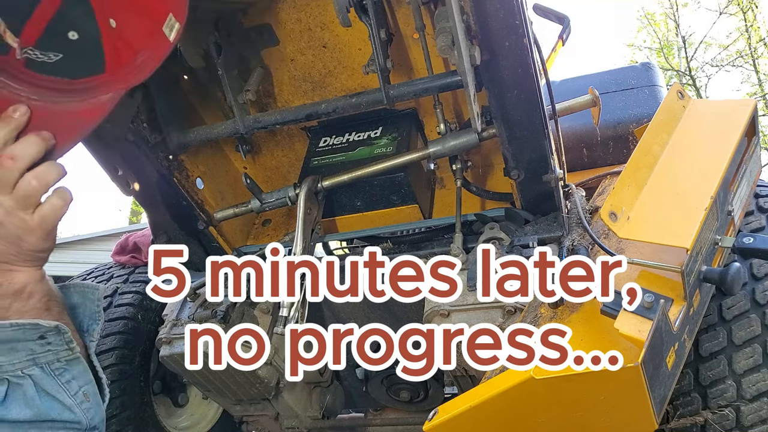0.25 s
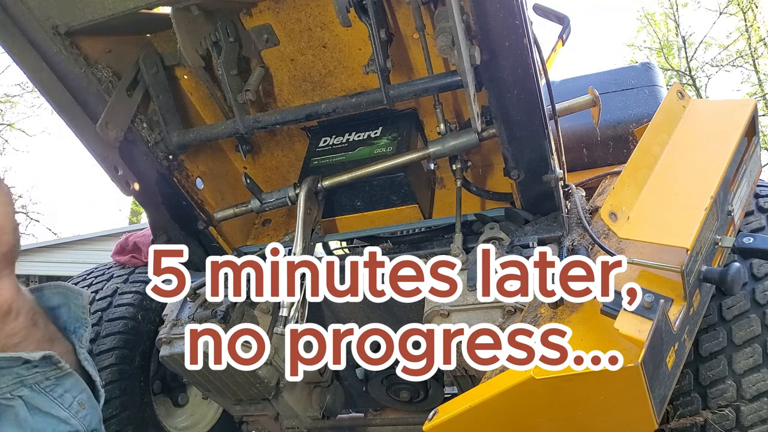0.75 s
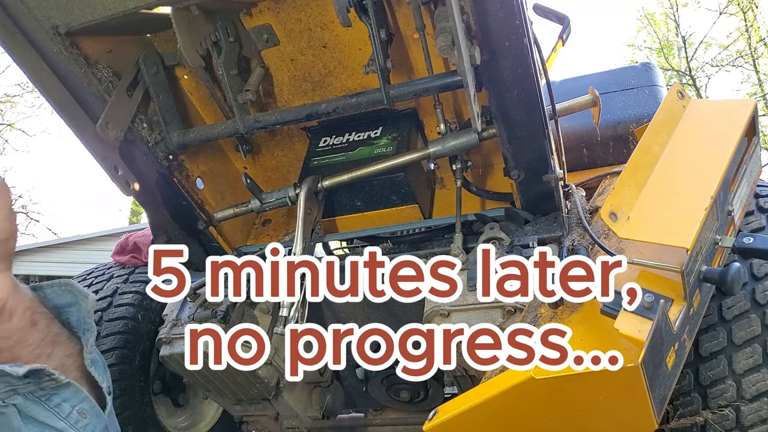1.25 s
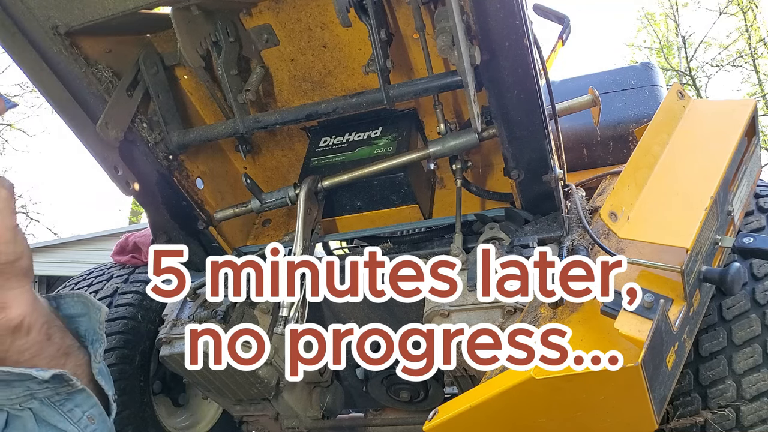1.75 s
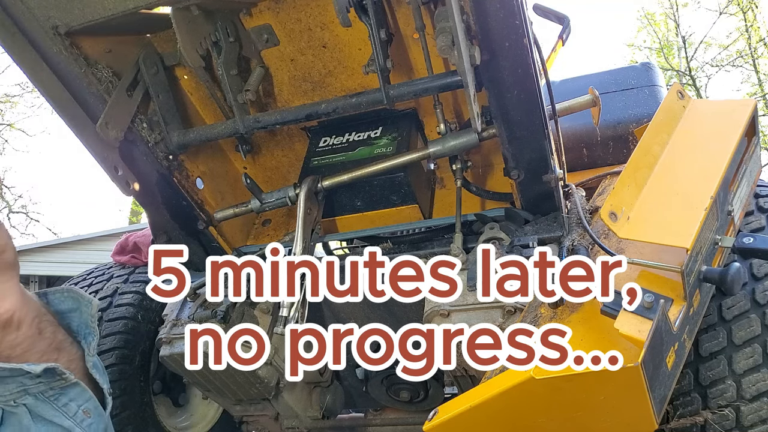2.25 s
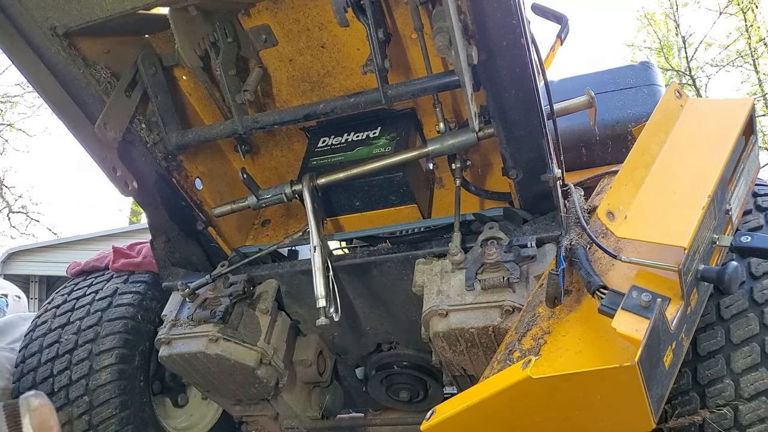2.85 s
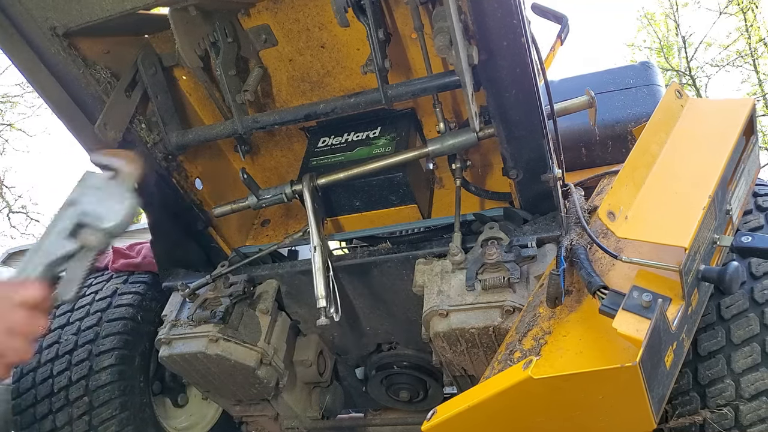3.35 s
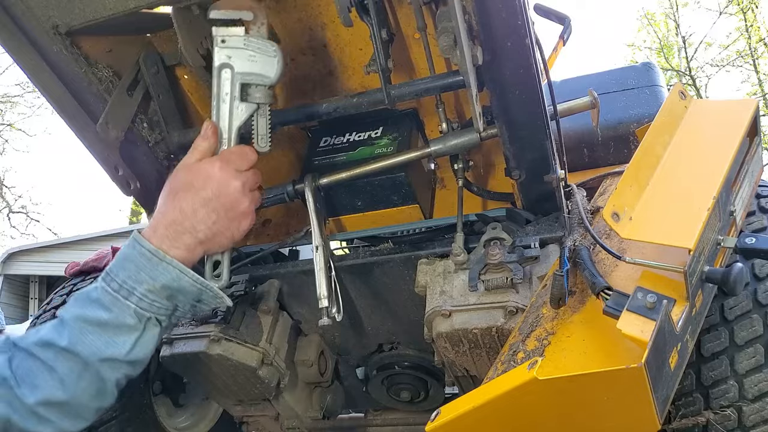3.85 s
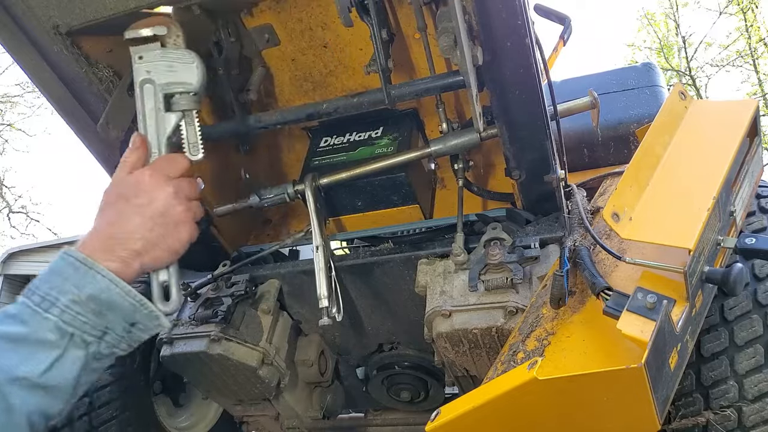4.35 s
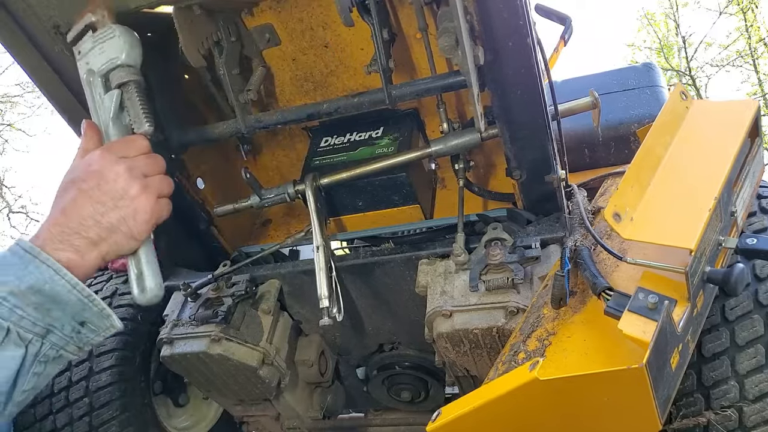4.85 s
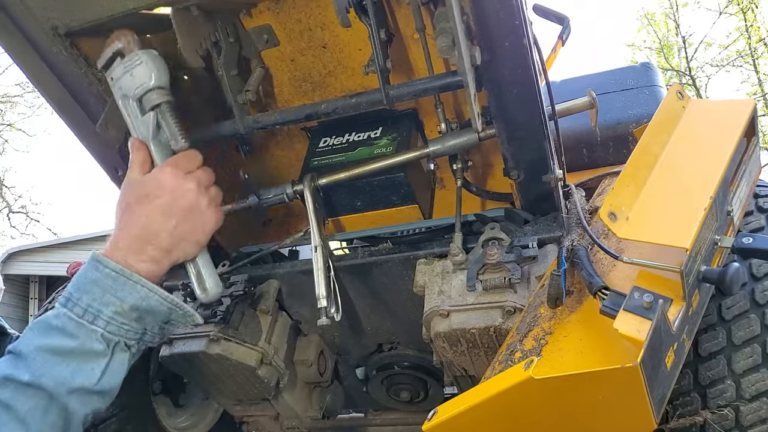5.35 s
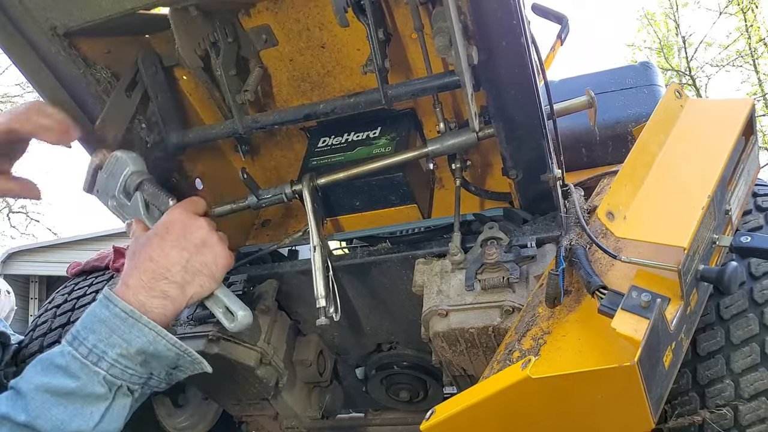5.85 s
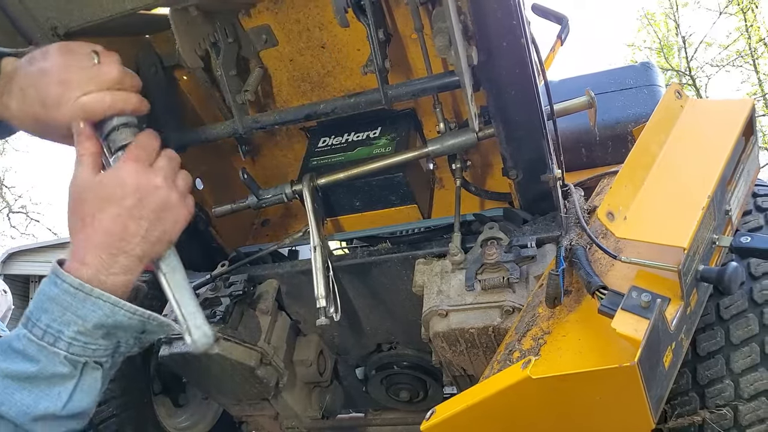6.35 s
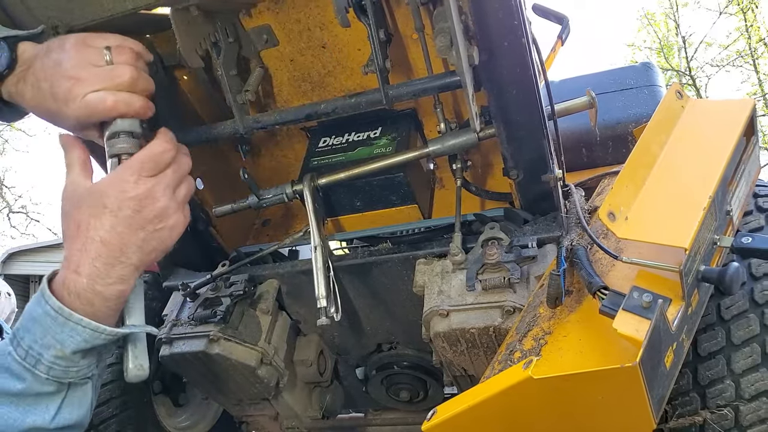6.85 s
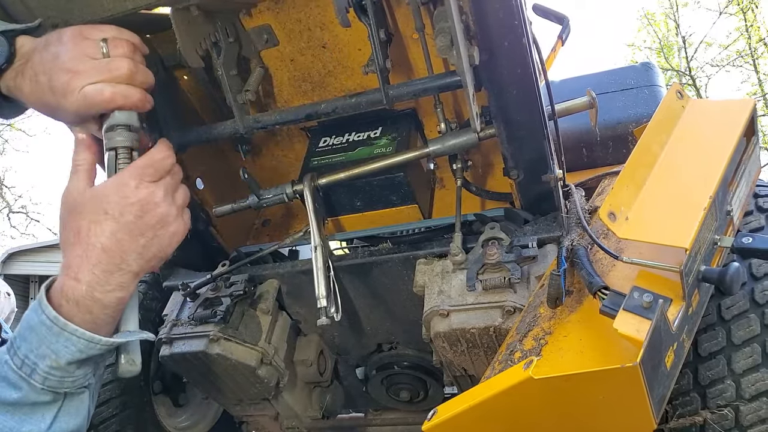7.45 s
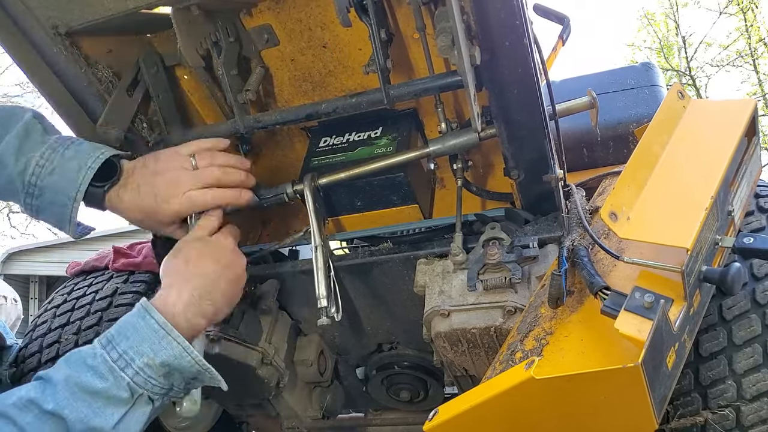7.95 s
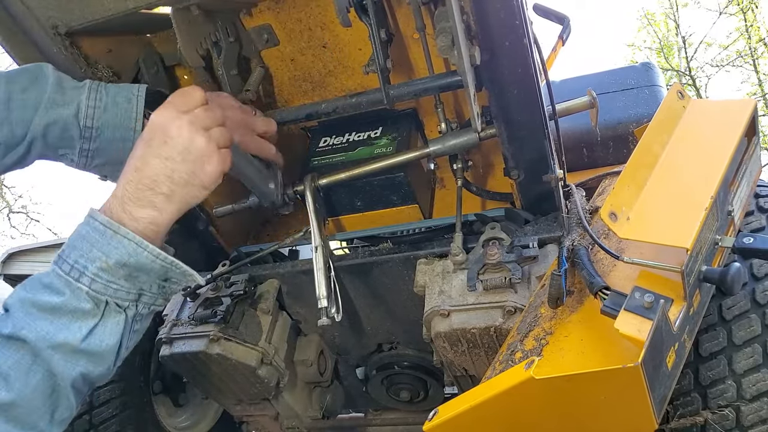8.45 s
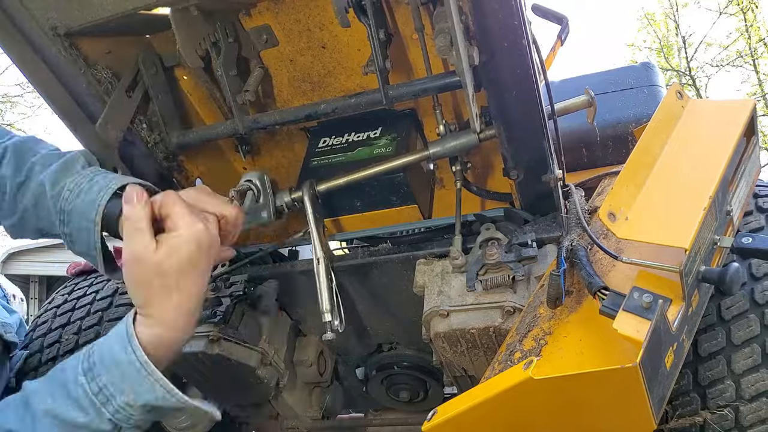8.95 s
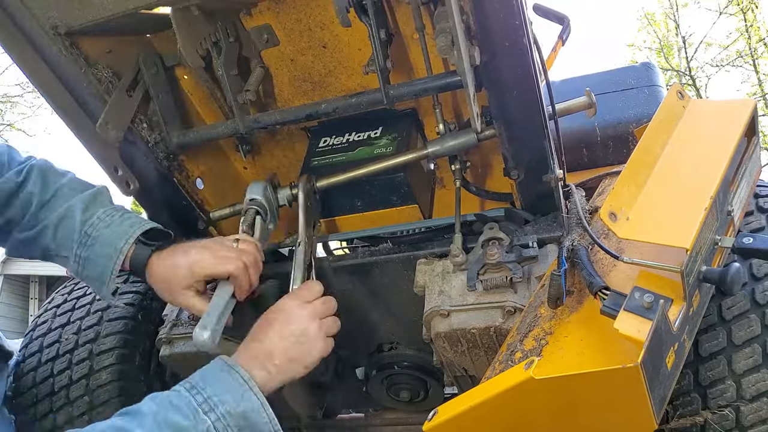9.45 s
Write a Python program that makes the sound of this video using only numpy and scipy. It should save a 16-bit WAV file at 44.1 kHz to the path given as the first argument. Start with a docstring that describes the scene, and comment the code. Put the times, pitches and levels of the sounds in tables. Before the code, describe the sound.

Outdoors, a heavy wrench clatters out of a hollow box and knocks on steel over birdsong, followed by quiet sped-up clicking.

```python
"""Outdoors beside a mower. A bird whistles over rumble, low mains hum and rustle; something soft scuffs.
From 2.3 s a pipe wrench is dragged out of a hollow box: slips and bumps ring the box, the loose jaw clinks.
At 5.7 s it knocks the steel frame, once hard, then faintly; from 6.7 s a thumb spins the jaw nut.
At 7.7 s the sound cuts to a much quieter stretch, like the same work at ten times the speed:
the hum becomes a thin tone, the blows become ticks."""
import sys
import numpy as np
from scipy import signal
from scipy.fft import rfft, irfft
from scipy.io import wavfile
from scipy.ndimage import uniform_filter1d

SR = 44100
rng = np.random.default_rng(int(sys.argv[2]) if len(sys.argv) > 2 else 0)


def int16_out(signal):
    """Quantize to a 16-bit WAV file."""
    q = np.round(np.clip(np.atleast_2d(signal).T, -1, 1) * 32767)
    wavfile.write(sys.argv[1], SR, q.astype(np.int16))


N = 428211
T = np.arange(N) / SR

# distant rumble (frequency [Hz], density [dB])
AIR_SPECTRUM = [(18, -39.5), (30, 8), (124, -3.5), (174, -12.5), (311, -15.5), (962, -31), (1540, -38.5),
                (1860, -33), (2610, -25.5), (3400, -24.5), (3770, -39.5), (5740, -32), (9460, -50),
                (11700, -34), (16000, -47)]
# yard noise (frequency [Hz], left-right coherence [0..1])
YARD_COHERENCE = [(60, 0.94), (200, 0.98), (600, 0.83), (1700, 0.48), (5000, 0.057), (15000, 0.62)]
# mains hum (frequency [Hz], level [dB])
HUM_TONES = [(119.6, -53.5)]
# rustle of leaves and cloth, swelling with the scrape of dragged tools (time [s], level [dB])
RUSTLE_LEVELS = [(0, -55.5), (.08, -51), (.21, -58), (.64, -58.5), (1.37, -67), (2.3, -65), (2.6, -47.5),
                 (3.0, -61.5), (3.4, -64.5), (3.85, -39.5), (4.05, -60), (4.42, -46.5), (4.65, -66.5),
                 (5.5, -54.5), (5.8, -83.5), (6.35, -59), (6.8, -67.5), (7.7, -83)]
# rustle (frequency [Hz], density [dB])
RUSTLE_SPECTRUM = [(180, -54), (300, -9.5), (701, -5.5), (1040, -12.5), (1390, -5.5), (2570, -6),
                   (3400, -13.5), (4440, -11), (11700, -20.5), (16000, -25.5)]
# bird phrases (fall onset [s], rise top [Hz], fall end [Hz], rise level [dB], fall level [dB])
BIRD_PHRASES = [(.113, 1930, 2990, -71, -49.5), (0.439, 1890, 3010, -63, -49), (.761, 1910, 3000, -62, -50),
                (1.069, 1910, 3000, -61.5, -50.5), (1.371, 1904, 3000, -59, -48),
                (4.151, 2014, 3300, -58.5, -54), (4.522, 2040, 3280, -72, -50),
                (4.865, 2006, 3234, -53, -47), (5.19, 1894, 3260, -54.5, -50.5),
                (5.49, 1940, 3190, -50.5, -46.5), (5.787, 1907, 3050, -49.5, -45.5),
                (6.099, 1926, 3130, -53.5, -46.5), (6.408, 1967, 3130, -54, -49),
                (6.729, 1900, 3044, -53, -46.5), (7.04, 1880, 3085, -56, -48.5)]
# far small birds (time [s], length [s], start [Hz], end [Hz], level [dB])
FAR_NOTES = [(0.717, 0.24, 4320, 4460, -69), (1.08, 0.25, 4310, 4490, -67),
             (1.119, 0.16, 5600, 5860, -66.5), (2.101, 0.099, 4130, 4320, -67),
             (2.255, 0.15, 4080, 4520, -63.5)]
# long falling notes ending a song (time [s], level [dB])
BIRD_SLIDES = [(1.646, -52.5), (1.919, -51), (2.232, -53), (7.336, -53)]
# hollow box and its tools (frequency [Hz], level [dB], t60 [s])
BOX_MODES = [(92.3, -5.5, 0.28), (148, -2.5, 0.13), (242.1, -3.5, 0.13), (310, -4.5, 0.065),
             (388, -2, 0.16), (493, 7, 0.037), (628, 3, 0.066), (772, 7.5, 0.031), (944, -1.5, 0.056),
             (1117, 6, 0.028), (1382, -9, 0.069), (1590, -22, 0.028), (1910, -27, 0.41),
             (2200, -5.5, 0.021), (2875, -32, 0.089)]
# tools bump the box (time [s], level [dB], centre [Hz], crack re level [dB])
BOX_BUMPS = [(0.353, -40.5, 229, -26), (2.361, -22, 300, -10), (2.376, -21, 95, -29),
             (2.399, -27, 100.5, -0.5), (2.455, -22, 366, -13.5), (2.51, -16.5, 354, -30),
             (2.528, -15.5, 440, -15), (2.557, -12, 526, -15), (2.624, -11.5, 363, -3.5),
             (2.691, -22, 108, -7), (2.744, -11, 382, -3.5), (2.836, -13, 126, -22), (2.884, -35, 102, 6.5),
             (3.192, -33.5, 102, -28), (3.213, -30.5, 109, 7.5), (3.405, -32.5, 410, -1),
             (3.536, -38.5, 119, -41), (3.579, -28, 457, -1), (3.624, -23.5, 334, -18.5),
             (3.656, -17.5, 366, -13), (3.694, -11.5, 407, -9.5), (3.718, -9, 740, -10.5),
             (3.734, -14.5, 103, 8.5), (3.796, -12, 603, -9.5), (3.829, -25, 611, -17.5),
             (3.877, -25.5, 102, -6.5), (3.913, -15, 234, -9.5), (3.947, -7.5, 745, -1),
             (3.999, -31.5, 339, 5.5), (4.029, -41, 347, -25), (4.272, -38, 339, -37),
             (4.326, -12.5, 380, -19.5), (4.343, -7.5, 630, -8.5), (4.374, -10, 463, -35.5),
             (4.43, -9.5, 436, -16), (4.45, -12, 223, -1), (4.498, -8, 362, -6), (4.661, -36, 131, -17),
             (4.746, -22.5, 110, -13), (4.774, -18, 99, -15), (5.056, -35, 116, -3),
             (5.226, -21.5, 380, -4), (5.367, -36, 282, -6), (5.4, -33.5, 310, 2.5), (5.492, -28, 241, -14)]
# contact grit (frequency [Hz], density [dB])
GRIT_SPECTRUM = [(500, -28.5), (1200, 4), (1800, 6), (3000, -1.5), (4200, -13.5), (7000, -19.5),
                 (10000, -40)]
# soft rub (peak [s], rise [s], hold [s], level [dB])
SCUFF_STROKES = [(1.444, 0.094, 0.041, -42.5)]
# dragged tools (peak [s], rise [s], hold [s], level [dB], grit re level [dB], sizzle re level [dB])
DRAG_STROKES = [(2.374, 0.029, 0.0043, -33, -17, -20.5), (2.527, 0.18, 0.063, -27.5, -15, -42),
                (2.626, .01, 0.0089, -28, -9, -25), (2.743, 0.004, 0.0063, -20.5, -11.5, -24),
                (2.82, 0.036, 0.11, -36.5, -15, -22.5), (3.215, 0.037, 0.061, -39, -7, -18),
                (3.33, 0.1, 0.078, -42.5, -8.5, -22), (3.439, 0.076, 0.026, -41, -8, -22),
                (3.537, 0.048, .005, -27.5, -18.5, -31), (3.688, 0.061, 0.067, -21.5, -15.5, -44),
                (3.816, 0.014, 0.0017, -18.5, -6, -10), (3.887, 0.019, 0.036, -21, -10.5, -28.5),
                (3.952, .03, 0.0021, -21.5, -14, -26), (4.269, 0.0054, 0.034, -24.5, -8, -20.5),
                (4.35, 0.077, 0.023, -18.5, -18, -23), (4.454, 0.093, 0.0023, -17.5, -16, -28.5),
                (4.506, 0.032, 0.0018, -26, -15, -24), (4.594, 0.056, .005, -51.5, 1, -36),
                (4.794, 0.3, 0.0065, -36, -17, -26.5), (4.934, 0.15, .2, -50, -7.5, -16),
                (5.242, 0.14, 0.0017, -37, -16, -50), (5.516, 0.6, 0.0031, -50, -1, -24),
                (5.657, 0.0072, 0.019, -32, 5.5, -16), (5.996, 0.29, 0.0089, -42.5, -10.5, -34)]
# drag sizzle (frequency [Hz], density [dB])
SIZZLE_SPECTRUM = [(3000, -25), (6500, 0.5), (9300, -9), (11300, 2.5), (14500, -9), (16000, -15.5)]
# loose wrench jaw (frequency [Hz], level [dB], t60 [s])
JAW_MODES = [(1800, -16, .04), (2191, -24, .1), (2560, -12, .04), (2745, -9, .06), (3548, -22, .06),
             (3870, -17, .06), (4230, -19, .16), (4530, -5, .07), (5150, -16, .04), (5890, 0, .06),
             (6450, -16, .05), (8450, -16, .06), (10700, -17, .04), (11100, -15, .14), (13680, -23, .22),
             (14270, -12, .045)]
# jaw clinks (time [s], level [dB], centre [Hz], crack re level [dB])
JAW_CLINKS = [(2.7433, -28.5, 2980, 4), (2.7572, -26, 11200, -10), (2.789, -29, 4530, 2.5),
              (2.8813, -37, 2730, -18), (2.9238, -19, 4660, -26), (2.9361, -22, 2240, -18),
              (3.1797, -40.5, 4530, -30), (3.2096, -26.5, 1860, -10), (3.2507, -24, 6000, 2.5),
              (3.2697, -25.5, 4100, -12), (3.3063, -31.5, 2720, -16), (3.3727, -44, 4100, 1),
              (3.437, -35, 2190, -19), (4.2693, -36, 7200, 20), (4.5813, -38, 2820, -4),
              (4.9183, -45.5, 3600, 7.5), (5.226, -45.5, 3330, -2), (5.33, -43, 6040, -15),
              (6.217, -42, 8750, 0), (6.541, -32.5, 5900, -14), (6.6751, -41.5, 5050, 14.5),
              (6.7822, -42, 4500, 4), (7.076, -23.5, 2720, -11.5), (7.0909, -22.5, 4400, 1),
              (7.3264, -41.5, 9000, 9.5), (7.364, -28, 5760, -4), (7.3839, -15.5, 4700, -21),
              (7.6089, -31.5, 10520, -8), (7.6267, -22.5, 2700, -3.5), (7.66, -22, 5770, -3),
              (7.6764, -13, 5400, 4), (7.687, -11.5, 4640, -6)]
# steel on steel (frequency [Hz], density [dB])
SNAP_SPECTRUM = [(700, -42), (1800, -3.5), (2800, -6), (6000, 0), (9300, -17.5), (11300, -1.5),
                 (14500, -18), (16000, -15.5)]
# steel frame (frequency [Hz], level [dB], t60 [s])
FRAME_MODES = [(603, -11, 0.45), (1047, 0, 0.09), (1255, -6, 0.1), (1470, -5, 0.17), (1820, -12.5, 0.28),
               (2082, -18, 0.28), (2034, -0.5, 0.16), (2700, -17.5, 0.35), (2710, -7, 0.068),
               (3114, -17, 0.1), (4220, -27.5, 0.16), (4260, -24.5, 0.14), (4300, -19, 0.097),
               (5200, -6.5, 0.075), (5500, -9.5, 0.3), (6040, -7.5, 0.062), (6500, -29, 0.075),
               (7770, -25, 0.13), (10400, -9, 0.085), (11160, -36, 0.83)]
# frame knocks (time [s], level [dB], centre [Hz], crack re level [dB])
FRAME_KNOCKS = [(5.657, -11.5, 2180, 4.5), (5.808, -34, 930, -15), (5.909, -38.5, 906, -14),
                (5.945, -35, 902, -26), (5.997, -38, 760, -12), (6.018, -35, 920, -17)]
# wrench on frame (frequency [Hz], density [dB])
BANG_SPECTRUM = [(250, -33), (700, 4), (1100, 5.5), (2200, 0.5), (3500, 2), (6000, -1), (9000, -19.5),
                 (16000, -45.5)]
# thumb on the nut (peak [s], rise [s], hold [s], level [dB])
NUT_STROKES = [(6.792, .055, 0.0013, -34), (7.09, .04, 0.014, -27.5), (7.39, .055, .004, -26),
               (7.61, .01, 0.062, -36.5), (7.686, .04, 0.01, -25)]
# thread grit (frequency [Hz], density [dB])
THREAD_SPECTRUM = [(410, -56.5), (700, -8), (2330, -5), (2660, 10), (3070, -5.5), (5470, 0.5), (5840, -24),
                   (7590, -43.5), (13000, -35.5), (14600, -44.5), (16000, -45.5)]
# thin air after the cut (frequency [Hz], density [dB])
FAST_AIR_SPECTRUM = [(120, -64), (200, -16), (366, -20), (432, -6.5), (500, -4), (851, -1.5), (1100, -3.5),
                     (1180, -3.5), (1320, -10.5), (3250, -21.5), (5230, -28.5), (15100, -45), (16000, -50)]
# raised hum (frequency [Hz], level [dB])
FAST_HUM_TONES = [(425.3, -84.5), (446.8, -81.5), (581.4, -84), (845.2, -82), (1200, -75)]
# scraping between hurried blows (time [s], level [dB])
FAST_SCRAPE_LEVELS = [(7.73, -62.5), (7.75, -69), (7.83, -86), (8.1, -89.5), (8.2, -72.5), (8.42, -80),
                      (8.52, -71), (8.8, -79.5), (8.92, -68.5), (9.2, -86.5), (9.34, -63), (9.46, -79.5),
                      (9.71, -97)]
# hurried blows (time [s], level [dB], pitch [Hz], thump re level [dB], fizz re level [dB])
FAST_BLOWS = [(7.858, -43.5, 5250, -31, -25), (8, -50.5, 5430, -22.5, -10), (8.087, -65.5, 1640, -7, -9),
              (8.1425, -36.5, 2830, -34, -10), (8.1718, -54, 5400, -13, -14), (8.188, -46, 3920, -10, -13),
              (8.2227, -37, 4600, -19, -8), (8.284, -50, 5080, -21, -18), (8.335, -40, 2000, -31, -12.5),
              (8.3666, -44, 8880, -25, -9), (8.472, -63, 2580, -11, -11), (8.521, -51.5, 5150, -4, -20.5),
              (8.6158, -56.5, 4450, -14, -23), (8.6584, -52, 5340, -20, -9), (8.7161, -49, 1590, -17, -13),
              (8.748, -46, 5100, -24, -7), (8.7779, -56, 2790, -12, -7), (8.8687, -50.5, 5230, -20, -11),
              (8.8883, -32, 4570, -35, -10), (8.924, -49.5, 3790, -8, -11.5),
              (9.0124, -50.5, 3020, -17, -19.5), (9.276, -55, 2610, -12, -20), (9.335, -43, 2500, -17, -22),
              (9.3851, -47, 4200, -10.5, -23), (9.398, -38, 4200, -10, -14), (9.643, -39, 5170, -20, -4.5),
              (9.6532, -38, 7200, -35, -19), (9.695, -55, 6300, -13, -14.5)]
# noise after the cut (frequency [Hz], left-right coherence [0..1])
FAST_COHERENCE = [(300, 0.87), (2000, 1.0), (15000, 0.39)]
# hurried scrape and fizz (frequency [Hz], density [dB])
SCRAPE_SPECTRUM = [(900, -12.5), (1800, -7), (3500, -5.0), (6000, -6.0), (9000, -25)]
FIZZ_SPECTRUM = [(4000, -49), (7000, 3.0), (11000, 1.0), (16000, 3)]
# thump under a tick (frequency [Hz], level [dB], t60 [s])
THUMP_MODES = [(480, -28, .03), (740, 11.5, 0.032), (934, 14, 0.031)]


def gain_of(db):
    """Decibels to amplitude."""
    return 10 ** (np.asarray(db) / 20)


def unit_rms(x):
    """Scales to rms 1."""
    return x / np.sqrt(np.mean(x ** 2) + 1e-20)


def value_at(table, hz):
    """Interpolates over log frequency."""
    table_hz, value = np.transpose(table)
    return np.interp(np.log(hz + 1), np.log(table_hz + 1), value)


def add(mix, at_s, sound):
    """Mixes a sound in."""
    part = mix[..., round(at_s * SR):][..., :sound.shape[-1]]
    part += sound[..., :part.shape[-1]]


def highpass(x, hz, order=2):
    """Butterworth bass cut."""
    return signal.sosfilt(signal.butter(order, hz, "high", fs=SR, output="sos"), x)


def envelope(levels):
    """Gain along a curve, silent outside it."""
    return gain_of(np.interp(T, *np.transpose(levels), -200, -200))


def flicker(depth_db, samples):
    """Random gain, rms 1."""
    return unit_rms(gain_of(depth_db * unit_rms(uniform_filter1d(rng.standard_normal(N), samples))))


def strokes(rows, fall_db_s, offset_db=0):
    """Gain of strokes: each climbs 25 dB over its rise, holds, decays; the loudest rules."""
    peak_s, rise_s, hold_s, db = np.transpose(rows)[:4, :, None]
    t = T[::32]
    rise_db = -25 * np.maximum(peak_s - t, 0) / rise_s
    fall_db = -fall_db_s * np.maximum(t - peak_s - hold_s, 0)
    stroke_db = db + np.reshape(offset_db, (-1, 1)) + rise_db + fall_db
    return gain_of(np.interp(T, t, stroke_db.max(0)))


def colour(x, spectrum):
    """Filters by a spectrum table; rms 1."""
    hz = np.fft.rfftfreq(len(x), 1 / SR)
    return unit_rms(irfft(rfft(x) * gain_of(value_at(spectrum, hz)), len(x)))


def hiss(spectrum, patch_db, coherence, lag_samples):
    """Stereo noise with drifting spectral patches, right channel late; rms 1."""
    hz = np.fft.rfftfreq(2048, 1 / SR)
    left_re, left_im, own_re, own_im, patches = rng.standard_normal((N // 512 + 5, 1025, 5)).T
    patches = unit_rms(uniform_filter1d(uniform_filter1d(patches, 24, axis=0), 8, axis=1))
    alike = np.clip(value_at(coherence, hz), 0, 1)[:, None]
    delay = np.exp(-2j * np.pi * hz * lag_samples / SR)[:, None]
    left = left_re + 1j * left_im
    right = alike * left * delay + np.sqrt(1 - alike ** 2) * (own_re + 1j * own_im)
    frames = np.array([left, right]) * gain_of(value_at(spectrum, hz)[:, None] + patch_db * patches)
    return unit_rms(signal.istft(frames, nperseg=2048, noverlap=1536)[1][:, :N])


def ring(modes, spread_db, t60_scale, detune, contact_s, centre_hz=1000, lean_db_oct=0):
    """One blow, peak 1. Spot and grip shift each mode and favour those near centre_hz."""
    hz, db, t60_s = np.transpose(modes)[:, :, None]
    t = T[:SR // 3]
    level_draw, pitch_draw, phase = rng.standard_normal((3, len(modes), 1))
    db = db - lean_db_oct * abs(np.log2(hz / centre_hz)) + spread_db * level_draw
    cycles = hz * (1 + detune * pitch_draw) * t + phase
    x = (gain_of(db - 60 * t / (t60_s * t60_scale)) * np.sin(2 * np.pi * cycles)).sum(0)
    x *= (1 - np.exp(-t / contact_s)) ** 2  # contact force builds
    return x / abs(x).max()


def crack(spectrum, t60_s):
    """Burst of contact noise."""
    return colour(rng.standard_normal(8192), spectrum) * gain_of(-60 * T[:8192] / t60_s) / 2


def chatter(modes, force, slips_per_s, size_db, **blow):
    """Uneven slips, scaled by force, ring one of 16 spots each. Returns (ringing, bare slips)."""
    sizes = gain_of(size_db * np.minimum(rng.exponential(1, N), 4))
    slips = unit_rms(sizes * (rng.random(N) < slips_per_s / SR))
    spots = rng.integers(0, 16, N)
    ringing = np.zeros(N)
    for spot in range(16):
        response = ring(modes, **blow)[:6000]
        response /= np.linalg.norm(response)
        ringing += signal.oaconvolve(force * slips * (spots == spot), response)[:N]
    return ringing, slips * rng.choice([-1, 1], N)


def place(x, lag_samples, treble_left_db, wet_db, t60_s):
    """To stereo: right channel late, treble panned, sparse thin echoes per side."""
    hz = np.fft.rfftfreq(N, 1 / SR)
    shade = gain_of(treble_left_db * np.minimum(hz / 9000, 1) / 2)
    delay = np.exp(-2j * np.pi * hz * lag_samples / SR)
    direct = irfft(rfft(x) * np.array([shade, delay / shade]), N)
    taps = rng.choice([-1., 1.], (2, SR)) * (rng.random((2, SR)) < .06)
    taps *= gain_of(-60 * T[:SR] / t60_s) * (T[:SR] > .002)
    taps /= np.linalg.norm(taps, axis=1)[:, None]
    echoes = signal.fftconvolve(highpass(x, 350)[None], taps, axes=1)[:, :N]
    return direct + gain_of(wet_db) * echoes


def hum(tones, waver_db):
    """Fixed pitches, each wavering in level."""
    out = np.zeros(N)
    for hz, db in tones:
        drift = unit_rms(uniform_filter1d(uniform_filter1d(rng.standard_normal(N), 3000), 3000))
        out += np.sqrt(2) * gain_of(db + waver_db * drift) * np.sin(2 * np.pi * hz * T)
    return out


def yard():
    """Rustle of leaves and cloth, swelling with the scrape of dragged tools; distant rumble; mains hum."""
    rustle_gain = envelope(RUSTLE_LEVELS) * flicker(2.5, samples=1500)
    rustle = rustle_gain * hiss(RUSTLE_SPECTRUM, 0.28, YARD_COHERENCE, lag_samples=11)
    rumble = gain_of(-51.5) * hiss(AIR_SPECTRUM, 0.8, YARD_COHERENCE, lag_samples=1.8)
    return rustle + rumble + hum(HUM_TONES, waver_db=1)


def whistle(length_s, start_hz, end_hz, db, bend, skew):
    """One gliding note; small skew peaks early."""
    progress = np.linspace(0, 1, round(length_s * SR))
    hz = end_hz + (start_hz - end_hz) * (1 - progress) ** bend
    swell = np.sin(np.pi * progress ** skew) ** .7
    return gain_of(db) * swell * np.sin(2 * np.pi * np.cumsum(hz) / SR)


def birds():
    """Soft rising whistles, hoarse falling ones and far twitter, smeared by the trees."""
    clean, hoarse, far = np.zeros((3, N))
    for at_s, top_hz, end_hz, rise_db, fall_db in BIRD_PHRASES:
        add(clean, at_s - .09, whistle(.095, top_hz - 170, top_hz, rise_db, bend=2.4, skew=.9))
        add(hoarse, at_s, whistle(.068, 3640, end_hz, fall_db, bend=1.4, skew=.6))
    for at_s, db in BIRD_SLIDES:
        add(hoarse, at_s, whistle(.125, 3260, 2010, db, bend=1.6, skew=.7))
    for at_s, *note in FAR_NOTES:
        add(far, at_s, whistle(*note, bend=1.51, skew=.55))
    blur = unit_rms(uniform_filter1d(rng.standard_normal(N), 70))  # a few hundred Hz wide
    song = clean * flicker(1.2, samples=300) + hoarse * flicker(3, samples=100) + far * blur
    early = place(song, lag_samples=8.7, treble_left_db=-9, wet_db=5.5, t60_s=0.078)
    return early + place(song, lag_samples=5.84, treble_left_db=-14, wet_db=1, t60_s=1)


def box_bumps():
    """Tools strike the hollow box: ring plus gritty crack."""
    out = np.zeros(N)
    for at_s, db, centre_hz, crack_db in BOX_BUMPS:
        body = ring(BOX_MODES, spread_db=3.5, t60_scale=0.77, detune=.05, contact_s=0.0016,
                    centre_hz=centre_hz, lean_db_oct=9)
        add(out, at_s, gain_of(db) * body)
        add(out, at_s, gain_of(db + crack_db) * crack(GRIT_SPECTRUM, t60_s=0.033))
    return out


def scuff(centre_hz=623):
    """Short dull rub: noise around one broad resonance."""
    spectrum = np.array([(0.35, -25), (0.38, -4), (1, 0), (1.8, -8), (4.2, -35)]) * (centre_hz, 1)
    rub = strokes(SCUFF_STROKES, fall_db_s=700) * colour(rng.standard_normal(N), spectrum)
    return place(rub, lag_samples=7, treble_left_db=2, wet_db=-21, t60_s=0.2)


def box_drag():
    """Dragged tools slip and ring the box; the contact adds grit and sizzle."""
    body, slips = chatter(BOX_MODES, strokes(DRAG_STROKES, fall_db_s=246), slips_per_s=400, size_db=4.3,
                          spread_db=6, t60_scale=0.32, detune=0.098, contact_s=0.0011)
    rub = slips + 0.7 * rng.standard_normal(N)
    grit_db, sizzle_db = np.transpose(DRAG_STROKES)[4:]
    grit = strokes(DRAG_STROKES, fall_db_s=399.5, offset_db=grit_db) * colour(rub, GRIT_SPECTRUM)
    sizzle = strokes(DRAG_STROKES, fall_db_s=448, offset_db=sizzle_db) * colour(rub, SIZZLE_SPECTRUM)
    return body + grit + sizzle * flicker(3.9, samples=300)


def jaw_clinks():
    """The loose jaw strikes steel: bright ring plus snap."""
    out = np.zeros(N)
    for at_s, db, centre_hz, crack_db in JAW_CLINKS:
        body = ring(JAW_MODES, spread_db=3, t60_scale=.95, detune=.002, contact_s=.0006,
                    centre_hz=centre_hz, lean_db_oct=17)
        add(out, at_s, gain_of(db) * body)
        add(out, at_s, gain_of(db + crack_db) * crack(SNAP_SPECTRUM, t60_s=.03))
    return out


def frame_knocks():
    """The wrench hits the steel frame: ring, bang and snap."""
    out = np.zeros(N)
    for at_s, db, centre_hz, crack_db in FRAME_KNOCKS:
        body = ring(FRAME_MODES, spread_db=0.93, t60_scale=0.75, detune=0.0028, contact_s=0.0005,
                    centre_hz=centre_hz, lean_db_oct=10)
        contact = crack(BANG_SPECTRUM, t60_s=0.098) + 0.34 * crack(SNAP_SPECTRUM, t60_s=.035)
        add(out, at_s, gain_of(db) * body)
        add(out, at_s, gain_of(db + crack_db) * contact)
    return out


def nut_spins():
    """A thumb spins the nut; the thread rasps and rattles the jaw."""
    force = strokes(NUT_STROKES, fall_db_s=796)
    rattle, slips = chatter(JAW_MODES, force, slips_per_s=1000, size_db=1.4, spread_db=2, t60_scale=.6,
                            detune=0.0025, contact_s=0.00019, centre_hz=3000, lean_db_oct=5.5)
    rasp = force * colour(slips + 0.67 * rng.standard_normal(N), THREAD_SPECTRUM)
    return 0.68 * rattle + 0.52 * rasp


def fast_yard():
    """Thin air and raised hum."""
    air = gain_of(-75) * hiss(FAST_AIR_SPECTRUM, 2.13, FAST_COHERENCE, lag_samples=0.9)
    return air + hum(FAST_HUM_TONES, waver_db=0.57)


def fast_scraping(rise_s=0.0096):
    """Gritty scrape and fizz, swelling at each hurried blow."""
    between = envelope(FAST_SCRAPE_LEVELS)
    scrapes = [(at_s, rise_s, 0, db - 26) for at_s, db, *_ in FAST_BLOWS]
    fizzes = [(at_s, rise_s, 0, db + fizz_db) for at_s, db, *_, fizz_db in FAST_BLOWS]
    scrape_gain = between + strokes(scrapes, fall_db_s=1200)
    fizz_gain = gain_of(-3) * between + strokes(fizzes, fall_db_s=1800)
    scrape = scrape_gain * hiss(SCRAPE_SPECTRUM, 2, FAST_COHERENCE, lag_samples=0.54)
    fizz = fizz_gain * hiss(FIZZ_SPECTRUM, 2.8, FAST_COHERENCE, lag_samples=0.39)
    return flicker(5.3, samples=200) * (scrape + fizz)


def fast_ticks():
    """Hurried blows: two-mode ping, crack and small thump, randomly panned."""
    out = np.zeros((2, N))
    for at_s, db, hz, thump_db, _ in FAST_BLOWS:
        left_db = rng.normal(-1, 1.5)
        modes = [(hz, 0, .011), (hz * 1.195, -4, .009)]
        ping = ring(modes, spread_db=3, t60_scale=1, detune=0.033, contact_s=0.001)[:8192]
        contact = crack(SCRAPE_SPECTRUM, t60_s=0.022)
        thump = ring(THUMP_MODES, spread_db=1.6, t60_scale=0.61, detune=0.071, contact_s=0.00088)[:8192]
        tick = 0.42 * ping + 0.7 * contact + gain_of(thump_db) * thump
        add(out, at_s, gain_of(db) * tick * gain_of([[left_db / 2], [-left_db / 2]]))
    return out


def scene():
    """Work at its own pace, a quick fade, then the hurried stretch."""
    cut_s, fade_out_s, fade_in_s = 7.722, 0.0088, 0.0041
    near = scuff()
    box = box_drag() + box_bumps()
    near += place(box, lag_samples=11.84, treble_left_db=4.5, wet_db=-0.25, t60_s=0.053)
    jaw = highpass(nut_spins() + jaw_clinks(), 800)  # the jaw and thread sound without bass
    near += place(jaw + frame_knocks(), lag_samples=6.09, treble_left_db=10, wet_db=-1.5, t60_s=0.025)
    work = yard() + birds() + highpass(near, 70)
    hurried = highpass(fast_yard() + fast_scraping() + fast_ticks(), 300, order=6)
    fade_out = np.clip((cut_s - T) / fade_out_s, 0, 1)
    fade_in = np.clip((T - cut_s) / fade_in_s, 0, 1)
    return fade_out * work + fade_in * hurried


def record(dry):
    """Low-pass at 16 kHz."""
    taps = signal.firwin(255, 16000, window=("kaiser", 13), fs=SR)
    return signal.oaconvolve(dry, taps[None], "same")


dry = scene()
out = record(dry)
int16_out(out)
```